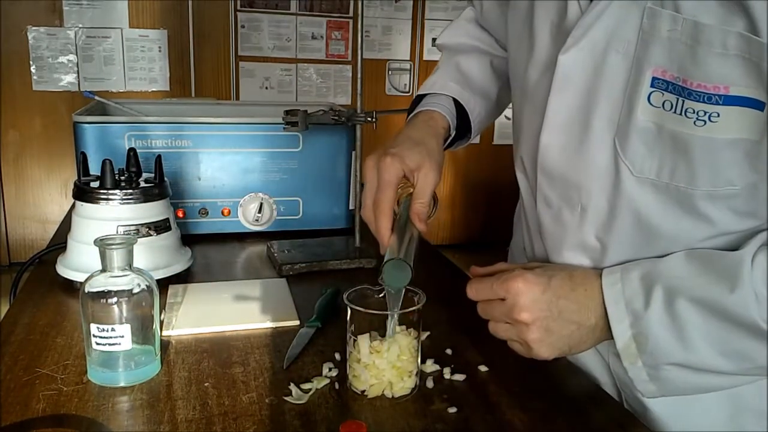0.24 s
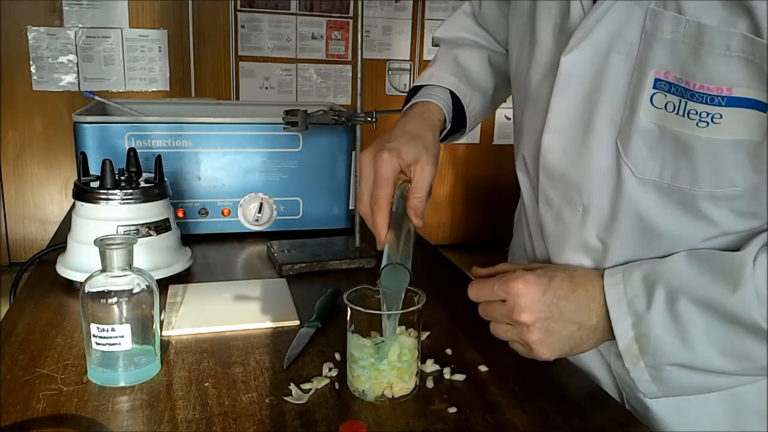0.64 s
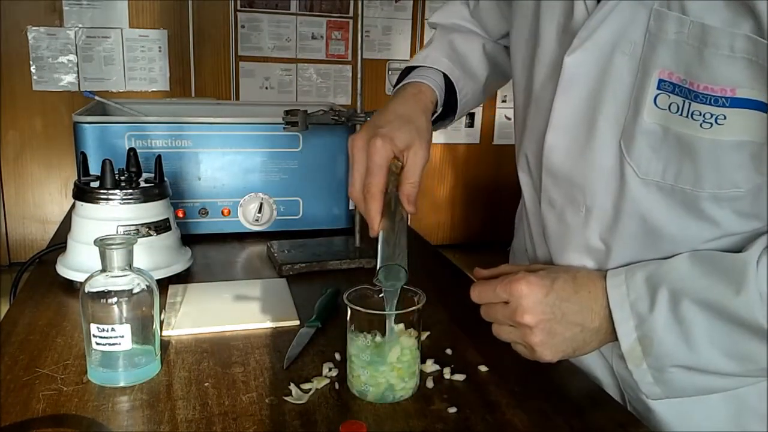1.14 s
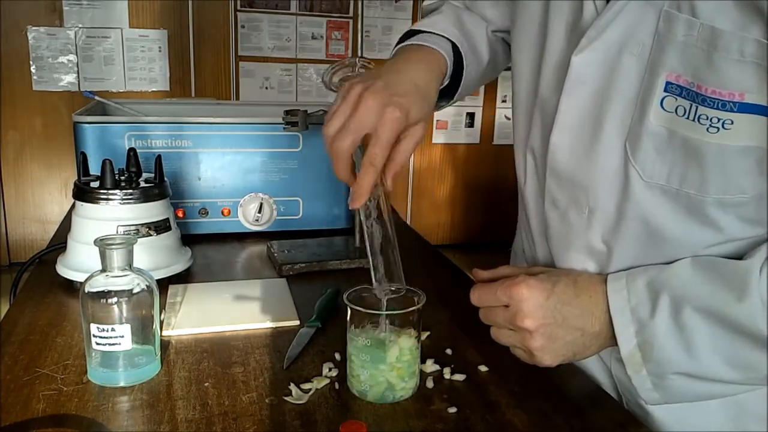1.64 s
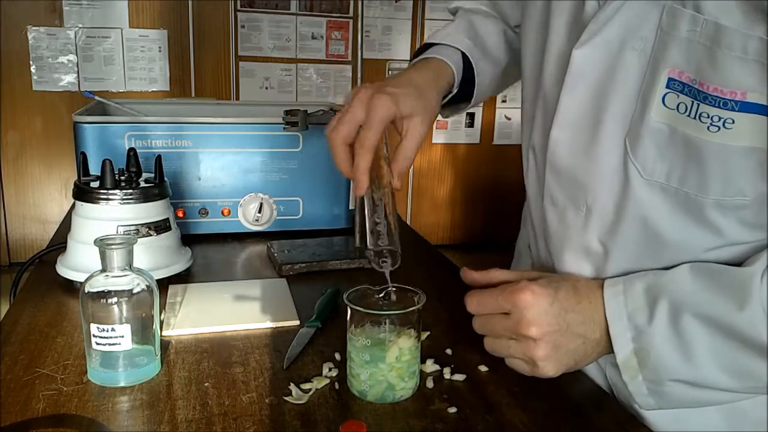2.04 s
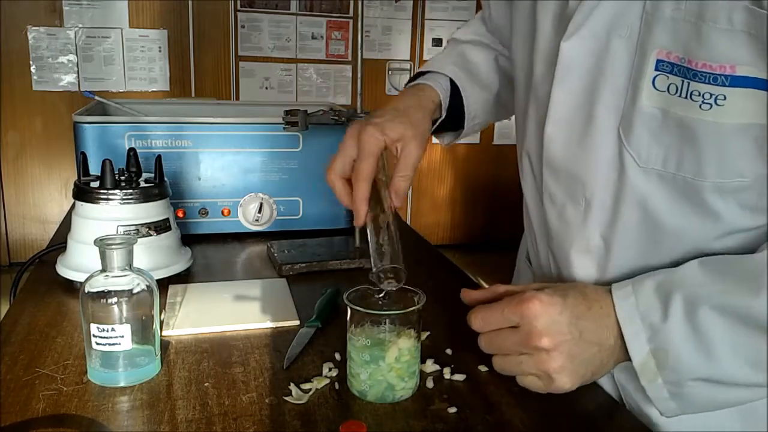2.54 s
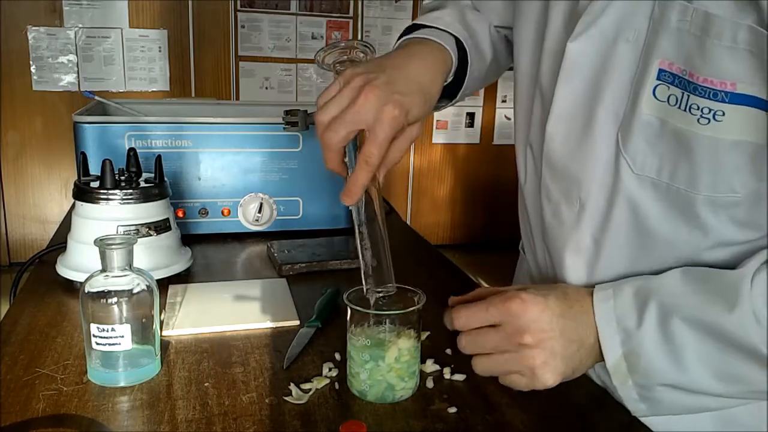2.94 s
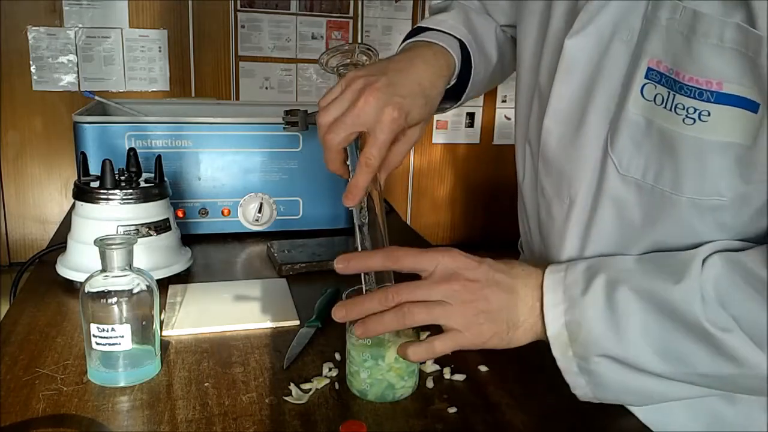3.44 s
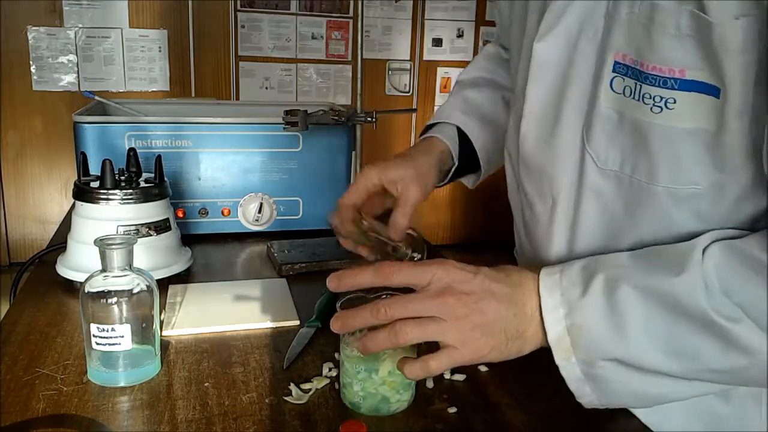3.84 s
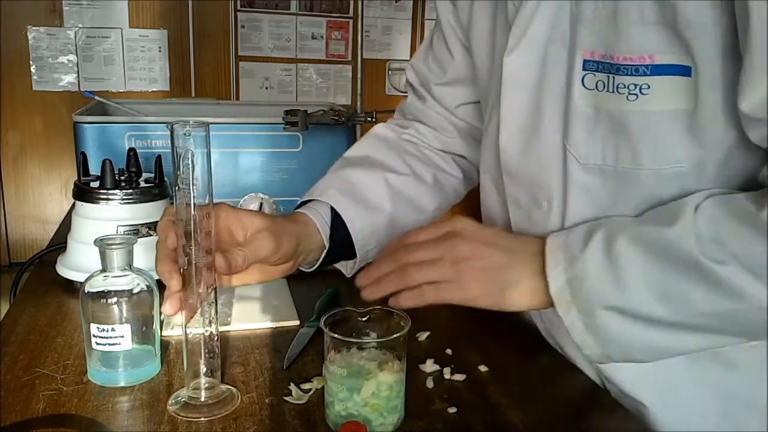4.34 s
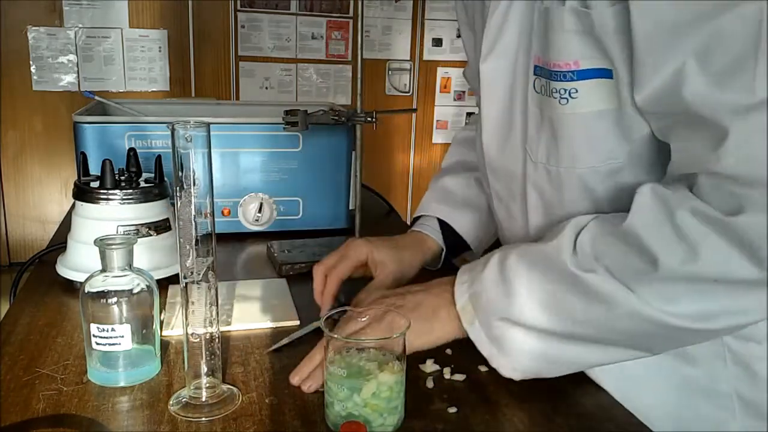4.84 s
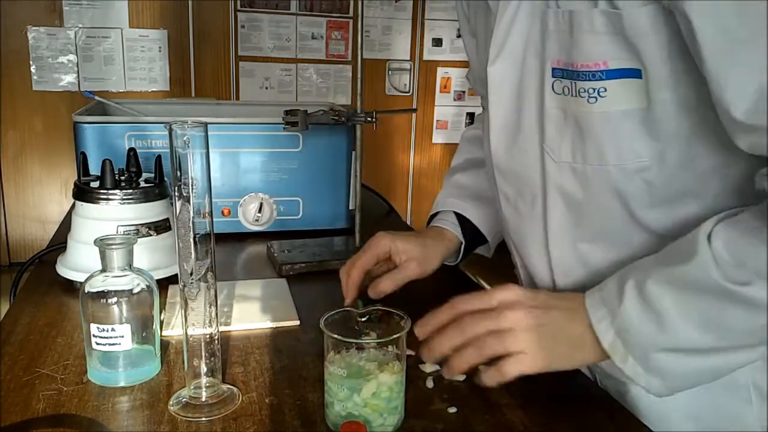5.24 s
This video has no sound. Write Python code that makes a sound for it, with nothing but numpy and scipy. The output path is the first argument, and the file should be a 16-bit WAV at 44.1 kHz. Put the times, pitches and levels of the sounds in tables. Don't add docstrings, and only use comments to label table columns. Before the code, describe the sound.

Faint pouring drips, four glass taps on a beaker, a loud wooden set-down, then a short scrape and cloth rustle in a small room.

```python
import sys
import numpy as np
from scipy import signal
from scipy.io import wavfile
from scipy.ndimage import uniform_filter1d

SR = 44100
rng = np.random.default_rng(int(sys.argv[2]) if len(sys.argv) > 2 else 0)


def generate_wav(signal):
    frames = np.transpose(np.atleast_2d(signal))
    scaled = np.clip(frames, -1, 1) * 32767
    pcm = np.round(scaled).astype(np.int16)
    wavfile.write(sys.argv[1], SR, pcm)


def rack_gain(trim_db):
    fader = np.asarray(trim_db, float)
    return 10 ** (fader / 20)


N = 242991


def evened(x):
    return x / np.sqrt(np.mean(x ** 2) + 1e-20)


def read(points, hz):
    point_hz, value = np.transpose(points)
    return np.interp(np.log(hz + 1), np.log(point_hz + 1), value)


def add(mix, start_s, sound):
    part = mix[round(start_s * SR):][:len(sound)]
    part += sound[:len(part)]


def swells(rows):
    t = np.arange(N) / SR
    power = sum(rack_gain(2 * db) * np.exp(-((t - middle) / half) ** 2) for middle, half, db in rows)
    return np.sqrt(power)


def noise(spectrum, patchy_db, size):
    hz = np.fft.rfftfreq(size, 1 / SR)
    real, imaginary, patches = rng.standard_normal((4 * N // size + 5, len(hz), 3)).T
    patches = uniform_filter1d(patches, size=10, axis=0)
    patches = evened(uniform_filter1d(patches, size=10, axis=1))
    level_db = read(spectrum, hz)[:, None] + patchy_db * patches
    z = (real + 1j * imaginary) * rack_gain(level_db)
    return evened(signal.istft(z, nperseg=size, noverlap=3 * size // 4)[1][:N])


def ring(modes):
    hz, db, t60 = np.transpose(modes)[:, :, None]
    t = np.arange(SR // 2) / SR
    sign = (-1.) ** np.arange(len(modes))[:, None]
    build = 1 - np.exp(-t * hz / 0.48)
    decay = rack_gain(db - 60 * t / np.maximum(t60, .003))
    split = np.where(hz < 1600, .035, 0)
    wave = 0
    for side, share in [(-1.3, 0.13), (-0.043, 0.76), (0.57, 0.35)]:
        wave = wave + share * np.sin(2 * np.pi * hz * (1 + side * split) * t)
    return (sign * build * decay * wave).sum(0)


def crack():
    t = np.arange(600) / SR
    burst = rng.standard_normal(len(t)) * (np.exp(-t / 0.00031) + 0.18 * np.exp(-t / 0.0053))
    return signal.lfilter(*signal.butter(2, [2200, 11500], "band", fs=SR), burst)


# frequency in Hz, time to fall 60 dB in seconds.
KNOCK_DECAY = [(200, 0.32), (700, 0.079), (1500, 0.086), (3000, 0.018), (5500, 0.048), (9000, 0.019),
               (15000, .02)]


def knock(colour):
    hz, t, z = signal.stft(rng.standard_normal(SR // 4), SR, nperseg=256, noverlap=224)
    z = z * rack_gain(read(colour, hz)[:, None] - 60 * t / read(KNOCK_DECAY, hz)[:, None])
    burst = signal.istft(z, SR, nperseg=256, noverlap=224)[1]
    build = 1 - np.exp(-np.arange(len(burst)) / 30.0)
    return burst / np.sqrt(np.mean(burst[:400] ** 2)) * build


# frequency in Hz, level in dB per Hz.
HUM = [(12, -22), (20, -6), (27, -38), (70, -26.5), (103, 7), (153, -3), (252, 0), (362, -8), (416, -15.5),
       (478, -14), (597, -11), (788, -20.5), (1410, -25), (8170, -34.5), (15500, -42.5)]


def room_air():
    hum_db = -55
    return rack_gain(hum_db + 1.23) * noise(HUM, patchy_db=1.03, size=1024)


# start in seconds, peak level in dB, frequency in Hz.
DROPS = [(.5415, -55, 7140), (.5425, -54, 4970), (.6917, -62, 3260), (.693, -61, 7700),
         (.7416, -52.5, 7060), (.742, -63, 3300), (.8274, -57, 3200), (.853, -63, 5660), (.9092, -61, 3230),
         (.9436, -63, 4100), (.9626, -57, 5170), (1.027, -61, 3000), (1.08, -51, 7600),
         (1.1413, -49.5, 2750), (1.155, -57, 6340), (1.178, -56, 5900), (1.19, -55, 4300),
         (1.222, -52.5, 2830), (1.2434, -50, 3660), (1.244, -58, 6300), (1.252, -57, 4500),
         (1.2659, -56, 5360), (1.268, -61, 6360), (1.296, -58, 2840), (1.32, -60, 6500),
         (1.325, -55.5, 3800), (1.357, -65, 2980), (1.421, -57, 3850), (1.432, -59.5, 1390),
         (.5415, -56, 5770)]
# start in seconds, level in dB.
TICKS = [
    (0.5407, -56),
    (.909, -65),
    (1.1413, -53),
    (1.244, -63),
    (1.2659, -60),
    (1.421, -60),
    (1.943, -54),
]


def drops():
    glide_per_s, snap_db = 9.5, -10
    out, t = np.zeros(N), np.arange(1500) / SR
    for start, db, hz in DROPS:
        t60 = 0.022 * (3000 / hz) ** 0.56
        turns = hz * t * (1 + glide_per_s * np.minimum(t, .008))
        bubble = np.sin(2 * np.pi * turns) * rack_gain(-60 * t / t60) * (1 - np.exp(-t / 0.00026))
        add(out, start, rack_gain(db) * bubble)
        add(out, start, rack_gain(db + snap_db) * crack())
    for start, db in TICKS:
        add(out, start, rack_gain(db) * crack())
    return out


# middle in seconds, half-length in seconds, level in dB.
RUSTLE = [
    (1.3, 0.34, -73.5),
    (2.1, 0.73, -71.5),
    (3.33, 0.17, -60),
    (3.65, 0.29, -70),
    (4.15, 0.13, -64),
    (4.6, 0.12, -59.5),
    (5.12, 0.2, -65),
    (5.6, .08, -56.5),
]
# frequency in Hz, level in dB per Hz.
CLOTH = [(400, 4), (1200, -3.5), (3000, -7), (5500, -6.5), (8000, -10.5), (11000, -18.5), (15500, -34)]


def sleeves():
    return swells(RUSTLE) * noise(CLOTH, patchy_db=1.0, size=256)


# frequency in Hz, level in dB, time to fall 60 dB in seconds.
GRAZE = [(835, -5, .2), (2105, -12, 0.092), (4800, -15, .08)]
# start in seconds, then ring, knock and crack levels in dB.
POUR_TAP = (1.0562, -33, -47, -49)
# frequency in Hz, level in dB, time to fall 60 dB in seconds.
WET_BEAKER = [(309, -6.5, 0.095), (505, -18, 0.17), (715, -6.5, 0.11), (900, -18.5, 0.12),
              (1264, -3.5, 0.048), (2210, -18, 0.04), (3200, -14.5, 0.028), (4930, -15.5, 0.017),
              (7670, -10.5, 0.017)]
# frequency in Hz, level in dB per Hz.
WET_KNOCK = [(120, -26), (200, -18), (721, -5), (1850, -14), (2210, -10), (2900, -21), (7690, -22),
             (15000, -59)]


def pouring_contacts():
    out = np.zeros(N)
    start, ring_db, knock_db, crack_db = POUR_TAP
    add(out, start, rack_gain(ring_db) * ring(WET_BEAKER))
    add(out, start, rack_gain(knock_db) * knock(WET_KNOCK))
    add(out, start, rack_gain(crack_db) * crack())
    graze_s, graze_db = .985, -54
    add(out, graze_s, rack_gain(graze_db) * ring(GRAZE))
    add(out, graze_s, rack_gain(graze_db - 6.5) * knock(WET_KNOCK))
    return out


def at_spot(modes, spot):
    hz, wall_db, lip_db, t60 = np.transpose(modes)
    shift = 0.021 * rng.uniform(-1.11, 1, len(hz)) * (hz < 1600)
    return np.c_[hz * (1 + shift), wall_db + spot * (lip_db - wall_db), t60]


# start in seconds, ring level in dB, knock level in dB,
# rim level in dB, spot struck from 0 (wall) to 1 (lip).
TAPS = [
    (1.5073, -24.5, -34, -44, 0.15),
    (1.8538, -27.5, -39, -44.5, .95),
    (2.9953, -33.5, -41, -58, 0.37),
    (3.2863, -28, -38.5, -51.5, 1),
]
# frequency in Hz, wall blow in dB, lip blow in dB, time to fall 60 dB in seconds.
BEAKER = [(246.4, -12, -7, 0.25), (299, -4.5, -0.5, 0.12), (371.4, -22, -11.5, 0.067),
          (535.5, -7, -17, 0.15), (714, -15, -13.5, 0.19), (915, -9.5, -11.5, 0.065),
          (1323, -7, -14.5, 0.048), (2160, -13, -16, 0.031), (2310, -7.5, -43, 0.046),
          (2430, -20.5, -8.5, 0.039), (3200, -10, -7, 0.013), (5040, -26, -22, 0.093),
          (5200, -10, -15.5, 0.029), (7510, -7.5, -12, 0.0091)]
RIM = [(4990, -6, 3.5, .061), (5460, 3, 5, .072), (5540, -1, 0, 0.027), (6056, -2, -1, 0.067),
       (7225, -21, -5, 0.036), (7940, -11, -7, .03), (10800, -12, -7, .015), (13700, -20, -11, .012)]
# frequency in Hz, level in dB per Hz.
WALL_KNOCK = [(150, -23), (400, -6), (1100, -9), (1750, -14), (2500, -12.5), (3900, -28), (5500, -18.5),
              (15000, -49)]
LIP_KNOCK = [(120, -26), (230, 4), (380, -14), (1500, -15.5), (2600, -21.5), (4300, -39), (5200, -14.5),
             (15000, -55)]


def taps():
    crack_over_knock_db = 4
    out, hz = np.zeros(N), np.geomspace(100, 16000, num=60)
    for start, ring_db, knock_db, rim_db, spot in TAPS:
        colour = np.c_[hz, (1 - spot) * read(WALL_KNOCK, hz) + spot * read(LIP_KNOCK, hz)]
        add(out, start, rack_gain(ring_db) * ring(at_spot(BEAKER, spot)))
        add(out, start, rack_gain(rim_db) * ring(at_spot(RIM, spot)))
        add(out, start, rack_gain(knock_db) * knock(colour))
        add(out, start, rack_gain(knock_db + crack_over_knock_db) * crack())
    return out


# middle in seconds, half-length in seconds, level in dB.
HANDLING = [
    (3.424, .025, -63),
    (3.555, 0.028, -55),
    (3.962, 0.021, -41),
    (4.01, .015, -49.5),
    (4.115, 0.021, -46),
    (4.19, 0.04, -50),
    (4.83, .02, -53.5),
    (4.98, 0.021, -61),
]
# frequency in Hz, level in dB per Hz.
HANDLING_COLOUR = [(100, -30), (190, -16), (250, -4), (340, 0), (480, -20), (800, -22), (2500, -45),
                   (6000, -75)]


def handling():
    return swells(HANDLING) * noise(HANDLING_COLOUR, patchy_db=5.0, size=512)


# start in seconds, ring level in dB, knock level in dB,
# spot from 0 (wall) to 1 (lip).
TOUCHES = [
    (3.5289, -45.5, -49, 0.054),
    (3.634, -58, -59, .9),
]
# frequency in Hz, wall blow in dB, lip blow in dB, time to fall 60 dB in seconds.
TOUCH = [(770, -11.5, -30, 0.23), (930, -3, -25, 0.074), (1370, -4, -16, .045), (2500, -6.5, -1, 0.025),
         (5070, -11, -30, .05)]
# frequency in Hz, level in dB per Hz.
TOUCH_KNOCK = [(240, -36), (400, 0), (967, -5), (1830, -17), (5110, -21.5), (12000, -28), (15600, -68)]


def touches():
    out = np.zeros(N)
    for start, ring_db, knock_db, spot in TOUCHES:
        add(out, start, rack_gain(ring_db) * ring(at_spot(TOUCH, spot)))
        add(out, start, rack_gain(knock_db) * knock(TOUCH_KNOCK))
    return out


# frequency in Hz, level in dB, time to fall 60 dB in seconds.
SHOVE = [(256, 3, 0.3), (344, -8, 0.14), (703, -7.5, 0.17), (917, -4, 0.17), (1250, -21, 0.045)]
# frequency in Hz, level in dB per Hz.
SHOVE_KNOCK = [(150, -14), (230, -2), (310, -14), (520, -37), (900, -2), (1700, -37), (3000, -60),
               (6000, -80)]


def shove():
    out, start = np.zeros(N), 3.947
    add(out, start, rack_gain(-37) * ring(SHOVE))
    add(out, start, rack_gain(-47) * knock(SHOVE_KNOCK))
    return out


# start in seconds, bench level in dB, glass level in dB,
# knock level in dB, flex of the bench top as a signed amplitude.
LANDING = [
    (4.2966, -30, -30.5, -24, 0.37),
    (4.3016, -24.5, -55, -38, 0.028),
    (4.3087, -22.5, -39, -25.5, -0.026),
    (4.3139, -23, -51, -32.5, -0.12),
    (4.3568, -31.5, -54.5, -44, 0.095),
]
# frequency in Hz, level in dB, time to fall 60 dB in seconds.
BENCH = [(168.5, -13.5, 0.42), (269, 0, 0.081), (342, -1, 0.44), (431.5, -0.5, 0.25), (490, -3, 0.18),
         (636, -2, 0.098), (690, 5, 0.09), (754, 7.5, 0.017), (895, 1, 0.045), (1075, -10, 0.097)]
FOOT = [(2433, 5.5, 0.033), (3160, -13, 0.018), (2440, -11.5, 0.12), (4200, -25, .01), (5590, -2.5, 0.11),
        (6056, -13, 0.21), (5660, -4, .05), (7230, -16, 0.081), (8700, -16, 0.055), (9800, -12, 0.019),
        (12000, -28, .045), (13700, -34, .06)]
# frequency in Hz, level in dB per Hz.
THUD = [(35, -45), (60, -16), (310, -19), (600, -4), (800, -2), (1130, -12), (1600, -12.5), (2300, -22),
        (3700, -34), (5000, -34.5), (7500, -22), (10000, -37), (15000, -60)]


def landing():
    out, u = np.zeros(N), np.arange(200) / SR / .00095
    push = np.sin(np.pi * u) * np.exp(-(u / 2.1) ** 6)
    wood, glass = ring(BENCH), ring(FOOT)
    for start, bench_db, glass_db, knock_db, flex in LANDING:
        add(out, start, rack_gain(bench_db) * wood + rack_gain(glass_db) * glass)
        add(out, start, rack_gain(knock_db) * knock(THUD))
        add(out, start, flex * push)
        add(out, start, rack_gain(knock_db - 14.0) * crack())
    return out


# start, attack, hold and release in seconds, then level in dB.
SLIDE = (4.845, .022, .092, .018, -47)
# frequency in Hz, width in Hz, level in dB.
SLIDE_RING = [(463, 45, 11.5), (902, 34, 13.5), (1500, 15, 0), (1810, 26, -8.5), (1210, 65, -25)]


def slide():
    slips = rng.standard_normal(N)
    unevenness = evened(uniform_filter1d(rng.standard_normal(N), size=250))
    slips = slips * rack_gain(1.1 * unevenness)
    slips = signal.lfilter(*signal.butter(5, 2000, fs=SR), slips)
    catch_s, catch_db, catch_fade_s = 4.911, 5, 0.013
    since = np.maximum(np.arange(N) / SR - catch_s, 0)
    slips = slips * rack_gain(catch_db * (since > 0) * np.exp(-since / catch_fade_s))
    out = np.zeros(N)
    for hz, width, db in SLIDE_RING:
        resonance = signal.lfilter(*signal.iirpeak(hz, hz / width, SR), slips)
        out += rack_gain(db) * np.sqrt(100 / width) * resonance
    start, attack, hold, release, level_db = SLIDE
    t = np.arange(N) / SR - start
    ramp = np.minimum(t / attack, (attack + hold + release - t) / release)
    return evened(out) * rack_gain(level_db) * np.clip(ramp, 0, 1) ** 2


# frequency in Hz, time to fall 60 dB in seconds.
ROOM = [(150, 0.33), (400, 0.44), (1000, 0.46), (2500, 0.24), (6000, 0.22), (12000, 0.26)]


def room(x):
    echoes = np.zeros(SR // 2)
    at = np.arange(200, len(echoes) - 20, 20)
    echoes[at + rng.integers(0, 20, len(at))] = rng.choice([-1., 1.], len(at))
    hz, t, z = signal.stft(echoes, SR, nperseg=256)
    tail = signal.istft(z * rack_gain(-60 * t / read(ROOM, hz)[:, None]), SR, nperseg=256)[1]
    dulled = signal.lfilter(*signal.butter(1, 5500, fs=SR), x)
    return signal.fftconvolve(dulled, tail / np.linalg.norm(tail))[:N]


def scene():
    small = taps() + touches() + pouring_contacts() + shove() + handling() + drops() + slide()
    small = signal.lfilter(*signal.butter(3, 140, "high", fs=SR), small)
    near = small + signal.lfilter(*signal.butter(2, 60, "high", fs=SR), landing())
    treble_limit = signal.ellip(10, .5, 50, 15500, fs=SR, output="sos")
    steady = signal.sosfilt(treble_limit, sleeves() + room_air())
    return (near + rack_gain(-8.5) * room(near) + steady)[None]


def top_cut(x):
    return signal.sosfilt(signal.butter(12, 16430, fs=SR, output="sos"), x)


def record(dry):
    power_db = 10 * np.log10(abs(uniform_filter1d(dry[0] ** 2, size=600)) + 1e-12)
    recovery_db = np.arange(N) * 6.43 / SR
    excess_db = np.maximum(power_db + 30.5, 0) * 0.77
    held_db = np.maximum.accumulate(excess_db + recovery_db) - recovery_db
    lag = np.exp(-1 / (0.016 * SR))
    duck_db = signal.lfilter([1 - lag], [1, -lag], held_db)
    treble_limit = signal.cheby2(12, 16, 15750, fs=SR, output="sos")
    limited = signal.sosfilt(treble_limit, dry)
    return top_cut(limited / rack_gain(duck_db))


dry = scene()
out = record(dry)
generate_wav(out)
```